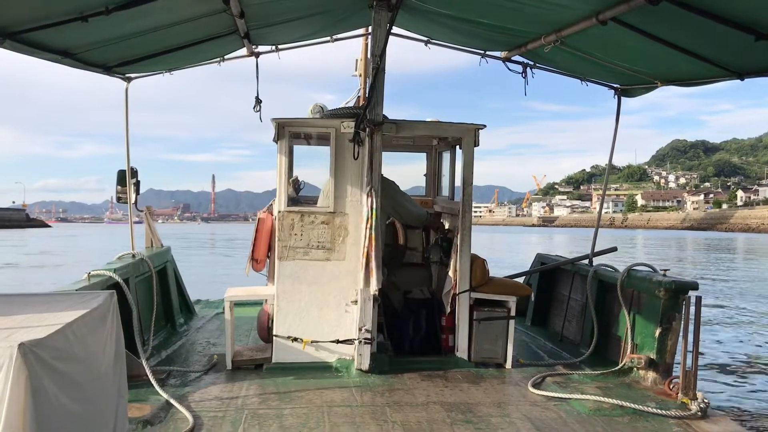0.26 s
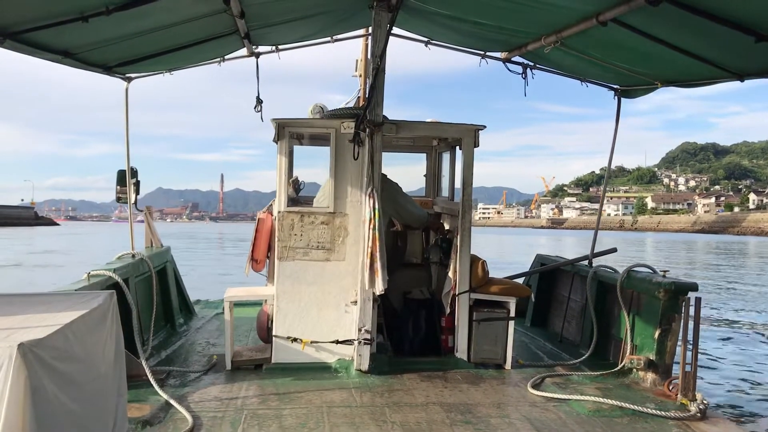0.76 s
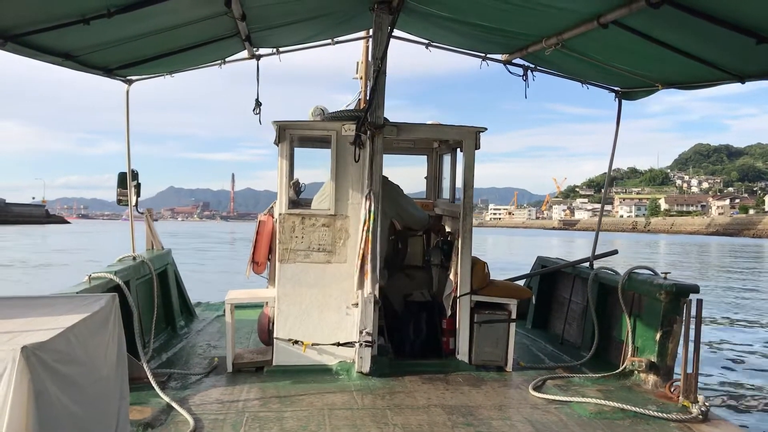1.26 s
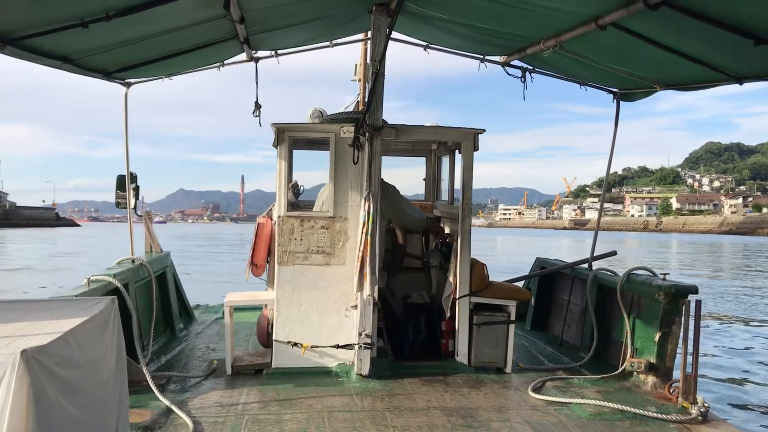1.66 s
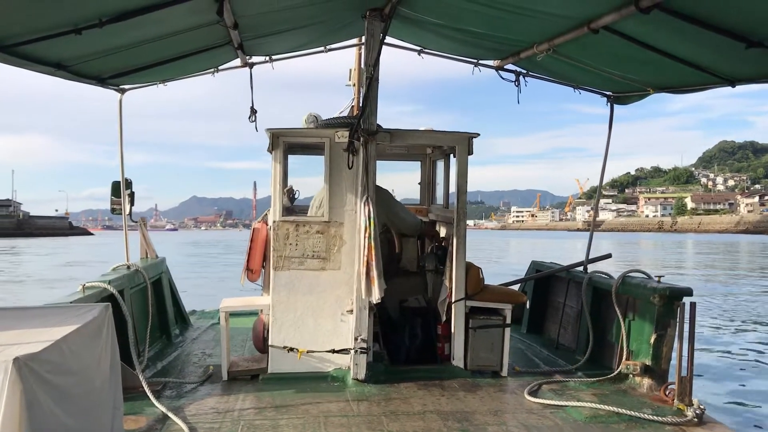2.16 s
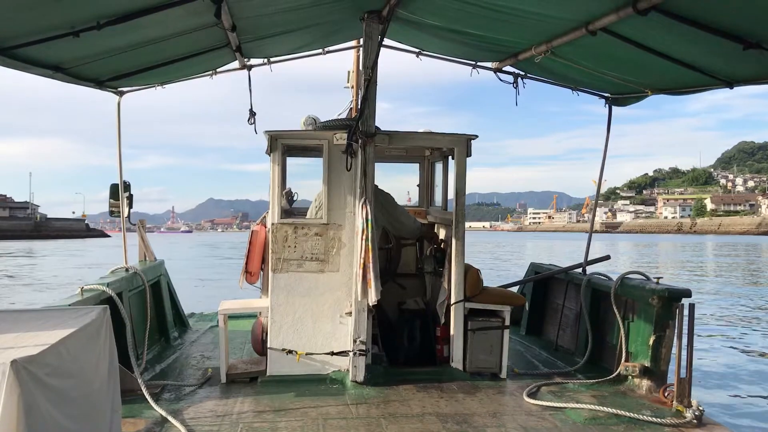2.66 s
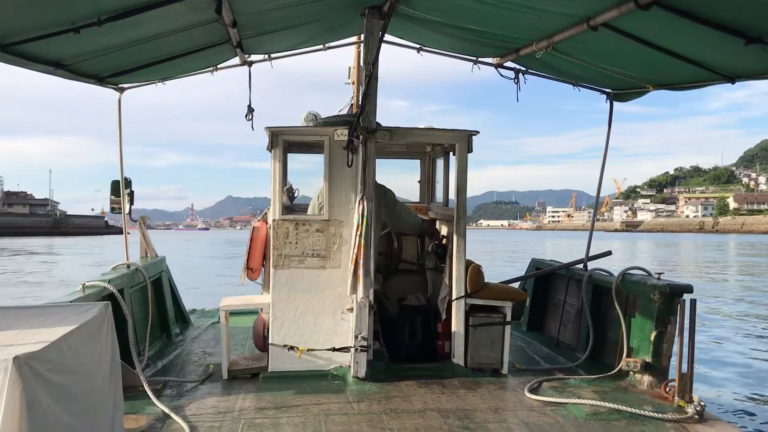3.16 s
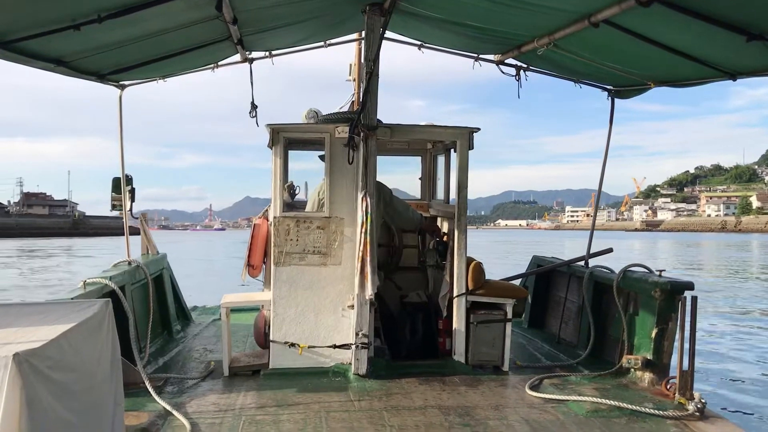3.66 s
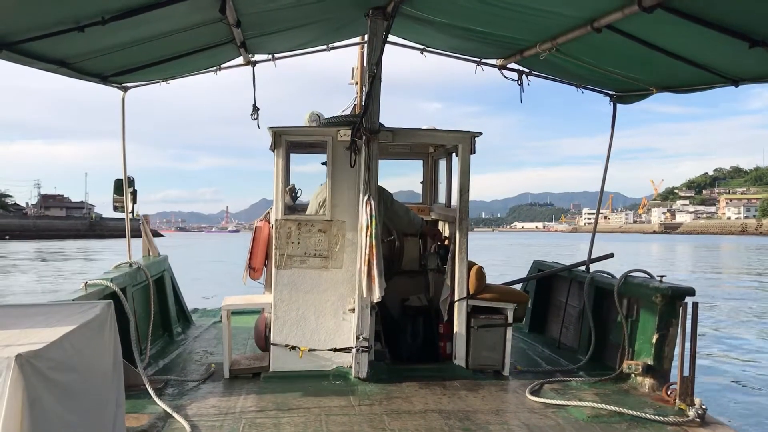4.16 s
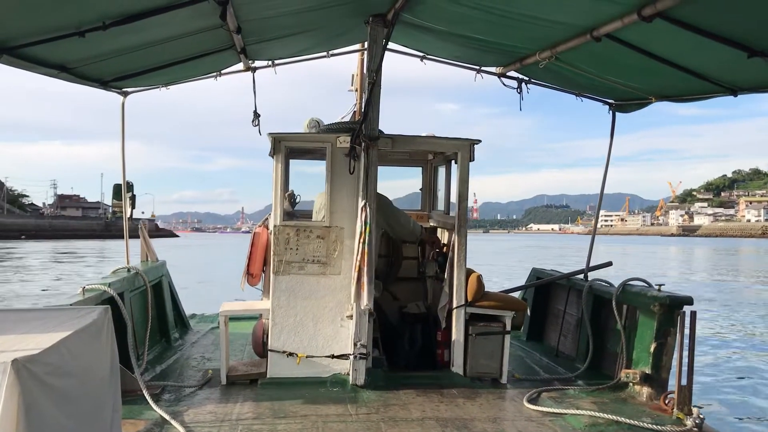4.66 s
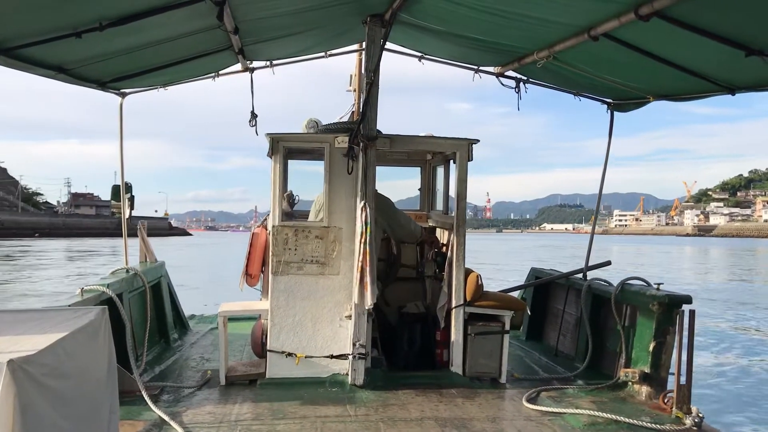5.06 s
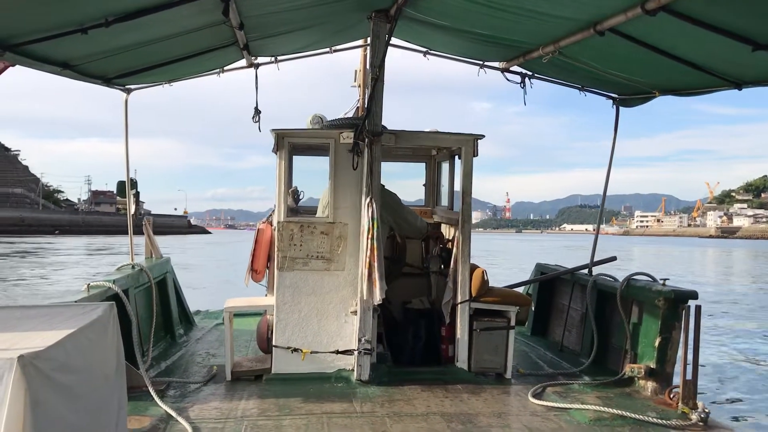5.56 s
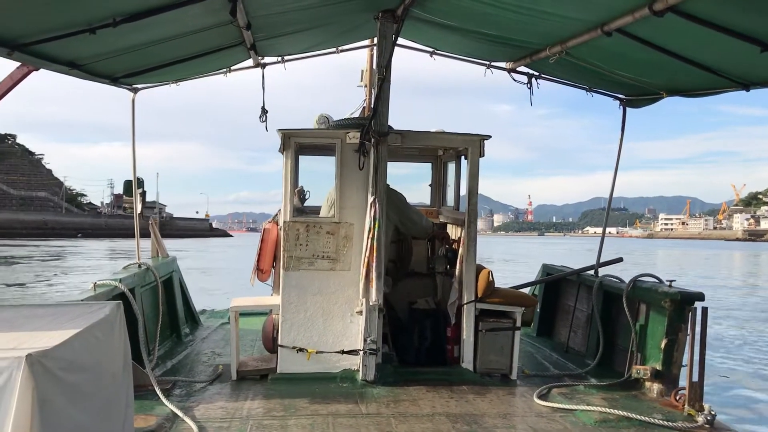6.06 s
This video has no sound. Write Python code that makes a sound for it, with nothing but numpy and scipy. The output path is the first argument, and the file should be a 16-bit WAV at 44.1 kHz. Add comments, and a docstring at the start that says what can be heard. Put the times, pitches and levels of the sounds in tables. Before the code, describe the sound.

A small ferry's four-cylinder diesel chugs steadily at close range, low droning throb under a fast metallic clatter, with no change in speed.

```python
"""On a small ferry's deck under way, a four-cylinder four-stroke diesel runs steadily near 1235 rpm throughout.
In each cycle four exhaust puffs throb as low tones, and noise cracks and injector ticks come close behind.
The repeating valve gear clatter bunches next; near mid cycle a cover clanks and one cylinder knocks brightly.
The cover clanks again, more softly, as the cycle ends. Hull panels, struck all through it, ring on as a drone,
and broad machinery noise churns underneath."""
import sys
import numpy as np
from scipy import signal
from scipy.fft import rfft, irfft, next_fast_len
from scipy.io import wavfile
from scipy.ndimage import uniform_filter1d, map_coordinates

SR = 44100
rng = np.random.default_rng(int(sys.argv[2]) if len(sys.argv) > 2 else 0)


def dump(signal):
    """Clip the signal to [-1, 1] and save it as 16-bit WAV at the path in sys.argv[1]."""
    limited = np.clip(np.atleast_2d(signal).T, -1, 1)
    pcm = np.round(limited * 32767).astype(np.int16)
    wavfile.write(sys.argv[1], SR, pcm)


N = 278271
TIME = np.arange(N) / SR  # s
LENGTH = next_fast_len(N + SR // 2)  # filter length in samples, with room for tails
HZ = np.arange(LENGTH // 2 + 1) * SR / LENGTH

RPM = 1234.3
CYCLE_HZ = RPM / 120  # one cycle is two turns of the crankshaft
DRIFT = .004  # spread of the slow timing drift, share of a cycle
MULTIPLES = np.arange(128)  # multiples of the cycle rate
CYCLE_SAMPLES = 4096  # length of one stored cycle of panel ring


def undb(db):
    """Decibels to gain."""
    return 10 ** (np.asarray(db) / 20)


def white():
    """White noise at 0 dB per Hz."""
    return rng.standard_normal(N) * np.sqrt(SR / 2)


def colour(x, gain):
    """Filter a sound with a gain given at every frequency of HZ."""
    return irfft(rfft(x, LENGTH) * gain, LENGTH)[:N]


def curve_db(points, hz):
    """A spectrum joined by straight lines over log frequency, falling 24 dB per octave more beyond its ends."""
    f, db = np.transpose(points)
    octave, known = np.log2(hz + 1), np.log2(f)
    beyond = abs(octave - np.clip(octave, known[0], known[-1]))
    return np.interp(octave, known, db) - 24 * beyond


def noise(points, resonances=()):
    """Noise with a given density in dB per Hz, lifted around resonances."""
    db = curve_db(points, HZ)
    for centre, width, lift in resonances:
        db = db + lift / (1 + (2 * (HZ - centre) / width) ** 2)
    return colour(white(), undb(db))


def walk(rate):
    """Smooth chance with a spread of 1, changing about rate times a second."""
    k = int(SR / rate)
    steps = np.repeat(rng.standard_normal(N // k + 1), k)
    y = uniform_filter1d(uniform_filter1d(steps, k), k)[:N]
    return y / y.std()


def burst(cycle, place, width, scatter_db):
    """A bell-shaped swell once a cycle around one place, with a new strength every time."""
    turn = cycle - place + 1.5  # puts the swell halfway through each whole turn
    strength = undb(scatter_db * np.clip(rng.standard_normal(size=128), -2, 2))
    return strength[turn.astype(int)] * np.exp(-.5 * ((turn % 1 - .5) / width) ** 2)


# irregular bed of combustion and machinery: f/Hz, density/(dB per Hz)
CHURN_SPECTRUM = [(20, -77.5), (48, -54.5), (190, -56.5), (260, -57), (420, -65.5), (750, -66.5),
                  (1100, -66), (2350, -74.7), (2750, -79), (4100, -80.5), (4950, -85.7), (6300, -87.5),
                  (8200, -96.5), (12500, -103), (15500, -109.5)]
# resonances of the engine block and its box: f/Hz, width/Hz, lift/dB
BLOCK_RESONANCES = [(554, 110, 4.7), (843, 25.5, 15.5), (1085, 23, 2), (1130, 55, 8.5), (1253, 40, 7.5),
                    (1660, 63, 6.3), (1780, 66, 3.3)]


def churn(cycle, pulse_db, pulse_place, flicker_db):
    """Broad noise through the block resonances pulses four times a cycle; negative pulse_db dips at its place."""
    pulse = np.cos(2 * np.pi * 4 * (cycle - pulse_place))
    return noise(CHURN_SPECTRUM, BLOCK_RESONANCES) * undb(pulse_db * pulse + flicker_db * walk(25))


# one injector per cylinder: place/cycle, level/dB
INJECTOR_TICKS = [(.15, -5), (.41, -4), (.66, -3), (.96, -1)]
# dry tick, before each injector's own level: f/Hz, density/(dB per Hz)
TICK_SPECTRUM = [(8000, -100), (12500, -101), (15500, -108)]


def injectors(cycle):
    """Four soft ticks a cycle, each a short swell of treble noise."""
    ticks = sum(undb(db) * burst(cycle, place, width=.03, scatter_db=1.8) for place, db in INJECTOR_TICKS)
    return noise(TICK_SPECTRUM) * ticks


# rattle of the cover, at the typical height of the softer clank: f/Hz, density/(dB per Hz)
CLANK_SPECTRUM = [(800, -73), (860, -68), (915, -65), (950, -62), (1010, -65), (1200, -69)]


def cover(cycle):
    """The cover clanks once per crankshaft turn as a swell of noise, harder near mid cycle than at the end."""
    hard = 1.6 * burst(cycle, place=.47, width=.045, scatter_db=.6)
    soft = burst(cycle, place=.99, width=.045, scatter_db=.6)
    return noise(CLANK_SPECTRUM) * (soft + hard)


# sharp ignition crack, at its typical height: f/Hz, density/(dB per Hz)
CRACK_SPECTRUM = [(1350, -72), (1660, -70), (2000, -79), (2500, -79)]


def ignitions(cycle):
    """Each of the four cylinders cracks as a brief noise burst, evenly spaced through the cycle."""
    cracks = sum(burst(cycle, .165 + k / 4, width=.012, scatter_db=1.5) for k in range(4))
    return noise(CRACK_SPECTRUM) * cracks


# ring of the hard cylinder's knock at its typical height: f/Hz, half-width at -6 dB/Hz, density/(dB per Hz)
KNOCK_MODES = [(3090, 180, -72.5), (3550, 180, -76), (3800, 180, -76), (4250, 350, -77.5), (5400, 500, -87),
               (6400, 600, -86)]


def knocks(cycle):
    """One cylinder knocks brightly in mid cycle; each knock favours different modes of the head."""
    out = np.zeros(N)
    for centre, width, db in KNOCK_MODES:
        ring = colour(white(), undb(db) / (1 + ((HZ - centre) / width) ** 2))
        out += ring * burst(cycle, place=.495, width=.05, scatter_db=2.2)
        out += ring * undb(-11.5 + 4.0 * walk(45))  # faint chatter that carries on throughout
    return out


# valve gear clatter, the same pattern in every cycle: f/Hz, density/(dB per Hz)
CLATTER_SPECTRUM = [(60, -78), (300, -67), (650, -68.5), (900, -70), (1130, -61.5), (1330, -76),
                    (1480, -66.5), (1900, -79), (2150, -74.5), (2650, -82), (4500, -112.5)]


def valve_gear(cycle, slack_s, waver_db, even_db):
    """Small impacts repeat with the camshaft, bunched four times a cycle; gear play shifts them slightly."""
    size = int(SR * TIME[-1] / cycle[-1])  # samples in one cycle
    hz = np.arange(size // 2 + 1) * SR / size
    bunching = 1 + .6 * np.cos(2 * np.pi * 4 * (np.arange(size) / size - .19))
    impacts = rfft(rng.standard_normal(size) * bunching ** 2)
    phases = impacts / abs(impacts)
    # favouring even multiples makes the two crankshaft turns more alike
    alike = even_db * np.cos(np.pi * np.arange(len(hz)))
    lines = phases * undb(curve_db(CLATTER_SPECTRUM, hz) + alike) * np.sqrt(size * SR / 2)
    # the clatter fills in between the strong tones
    strong = abs(sum(panel_tones(*panel) for panel in PANEL_MODES)) > undb(-49)
    lines[[k for k, _ in EXHAUST_TONES] + list(MULTIPLES[strong])] = 0
    place = cycle * size + slack_s * SR * walk(40)
    clatter = map_coordinates(irfft(lines, size), [place % size], order=3, mode="grid-wrap")
    return clatter * undb(waver_db * walk(20))


def casing(x, ripple_db, spacing_hz):
    """Close modes of the iron casing ripple the spectrum at random; in the treble they overlap and even out."""
    ripple = np.interp(HZ / spacing_hz, np.arange(2048), rng.standard_normal(size=2048))
    depth = np.interp(HZ, [600, 1500, 3000, 8000], [0, 1, .8, .3])
    return colour(x, undb(ripple_db * depth * ripple))


def panel_tones(hz, width, db, place, lesser):
    """Two blows half a cycle apart ring a mode at the multiples of the cycle rate near its own pitch."""
    blows = np.exp(-2j * np.pi * MULTIPLES * place) * (1 + lesser * np.cos(np.pi * MULTIPLES))
    mode = 1 / (1 + 2j * (MULTIPLES * CYCLE_HZ - hz) / width) ** 2
    firing = [k for k, _ in EXHAUST_TONES]  # left to the exhaust; the panels keep above the lowest
    return undb(db) * blows * mode * (MULTIPLES > firing[0]) * ~np.isin(MULTIPLES, firing)


# modes of hull and engine box, struck by a main blow and a lesser one half a cycle later:
# f/Hz, width at -6 dB/Hz, rms level of a tone at the mode's pitch from the main blow alone/dB,
# place of the main blow/cycle, strength of the lesser blow/share of the main
PANEL_MODES = [(99, 300, -48, .47, 0), (178, 24, -27.1, .794, .12), (195, 19, -28.3, .247, 0),
               (247, 24, -42.8, .927, 0), (282, 15, -35.1, .615, .68), (321, 33, -40, .481, 0),
               (363, 32, -46.5, .95, .73), (454, 46, -45.5, .329, 0), (496, 25, -41.7, .483, .38),
               (548, 39, -41, .707, .42), (679, 14, -44.5, .66, .3), (724, 20, -42.5, .66, .2),
               (902, 53, -42.8, .788, 1), (926, 57, -37.2, .912, .05), (935, 14, -31.3, .043, .79)]


def hull(cycle, gain_db, waver_db, slack_s):
    """Panels ring on from blow to blow, chugging ten times a second; time and strength vary a little."""
    timing = cycle + slack_s * CYCLE_HZ * walk(24)
    place = timing % 1 * CYCLE_SAMPLES
    out = np.zeros(N)
    for panel in PANEL_MODES:
        ring = irfft(panel_tones(*panel), CYCLE_SAMPLES) * CYCLE_SAMPLES / np.sqrt(2)
        out += undb(waver_db * walk(14)) * map_coordinates(ring, [place], order=1, mode="grid-wrap")
    return undb(gain_db) * out


# exhaust tones: f/multiple of the cycle rate, rms level before the exhaust gain/dB
EXHAUST_TONES = [(4, -21.8), (8, -28.8), (12, -38.5), (16, -23.6)]
EXHAUST_PLACE = .11  # where the first puff peaks, share of a cycle


def exhaust(cycle, gain_db, waver_db):
    """Four even puffs a cycle, rounded by the silencer to a few low tones that waver in level."""
    puffs = np.zeros(N)
    for k, db in EXHAUST_TONES:
        tone = np.cos(2 * np.pi * k * (cycle - EXHAUST_PLACE))
        puffs += undb(db + waver_db * walk(7.2)) * tone
    return np.sqrt(2) * undb(gain_db) * puffs


def scene():
    """Every source follows one engine cycle, which drifts slightly early and late."""
    cycle = TIME * CYCLE_HZ + DRIFT * walk(1)
    bed = churn(cycle, pulse_db=-0.5, pulse_place=.17, flicker_db=0.65)
    gear = valve_gear(cycle, slack_s=.00003, waver_db=1.0, even_db=0.5)
    clatter = injectors(cycle) + cover(cycle) + ignitions(cycle) + knocks(cycle) + gear
    machinery = casing(bed + clatter, ripple_db=2.5, spacing_hz=30.1)
    drone = hull(cycle, gain_db=0, waver_db=0.1, slack_s=.00005)
    throb = exhaust(cycle, gain_db=.1, waver_db=0.2)
    return (machinery + drone + throb)[None]


def record(dry):
    """The microphone has a dip in the high treble, and a steep low-pass cuts the top."""
    dip_hz, dip_width_hz, dip_db = 10600, 2300, -13
    notched = signal.lfilter(*signal.iirnotch(dip_hz, dip_hz / dip_width_hz, fs=SR), dry)
    coloured = notched + undb(dip_db) * (dry - notched)  # part of the notched band is put back
    top_hz = 15700
    return signal.sosfilt(signal.ellip(10, .1, 80, top_hz, fs=SR, output="sos"), coloured)


dry = scene()
out = record(dry)
dump(out)
```